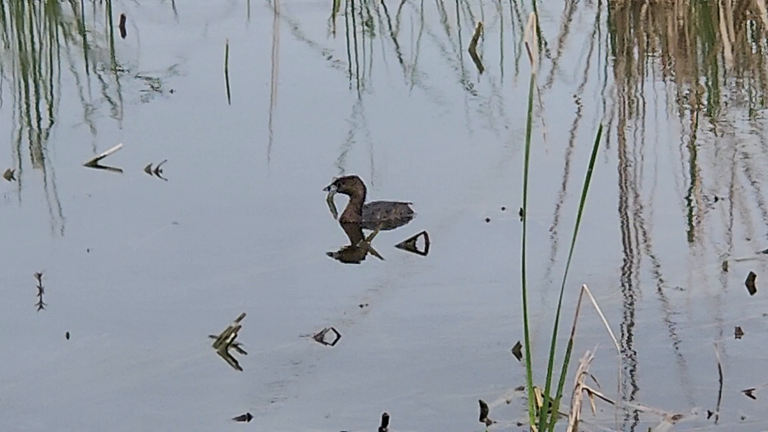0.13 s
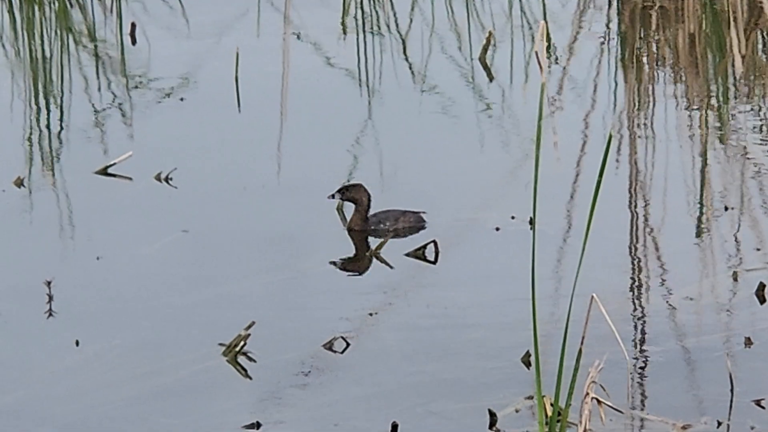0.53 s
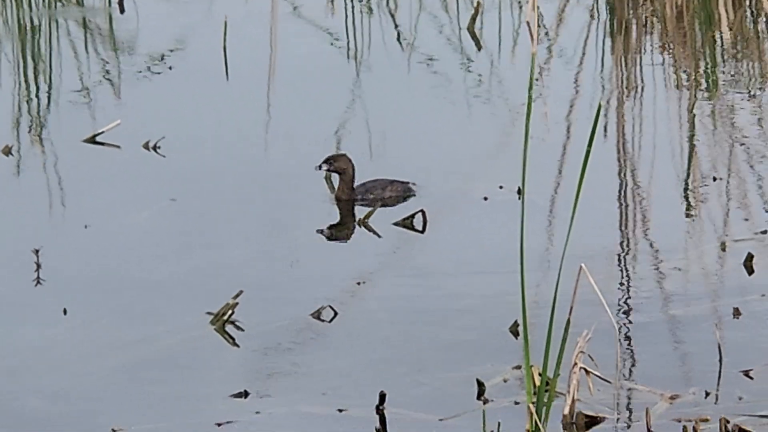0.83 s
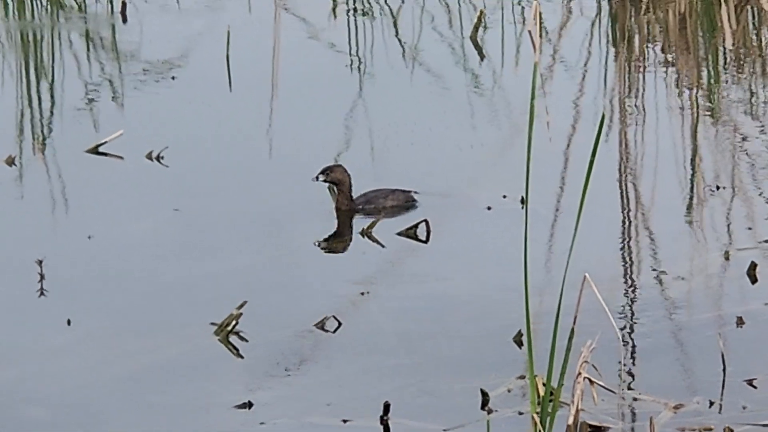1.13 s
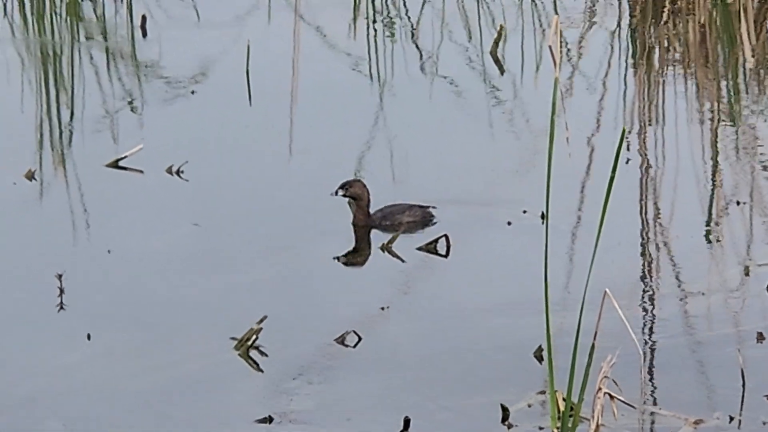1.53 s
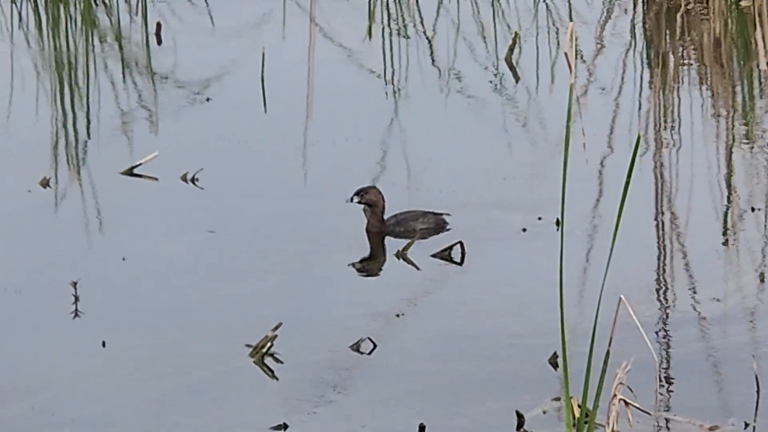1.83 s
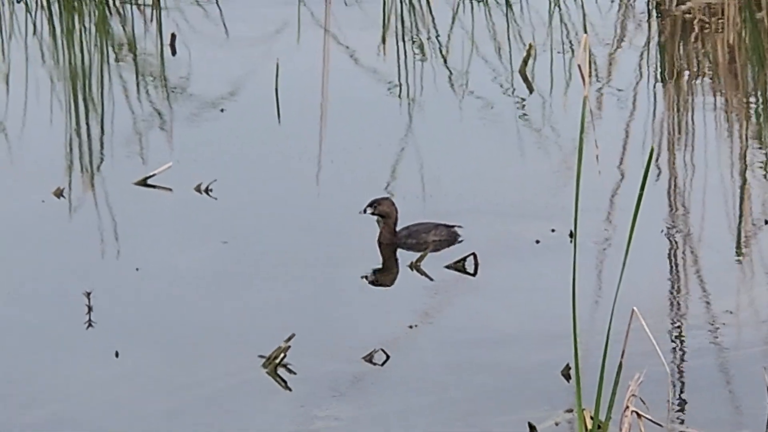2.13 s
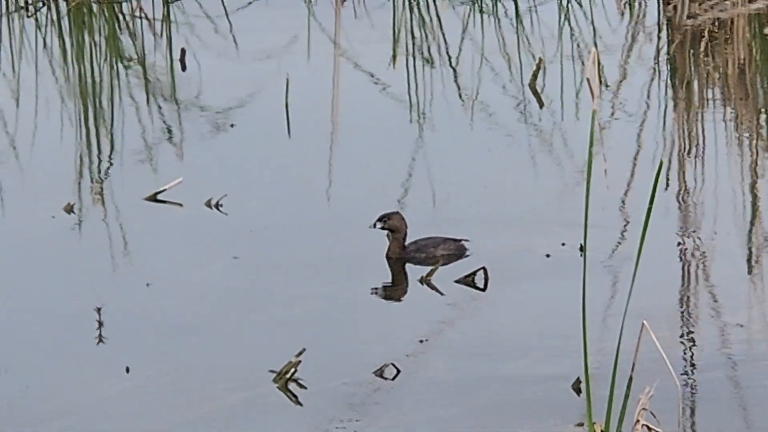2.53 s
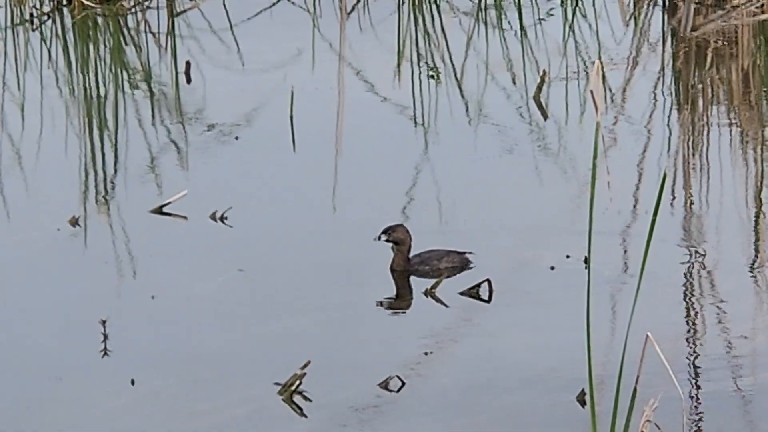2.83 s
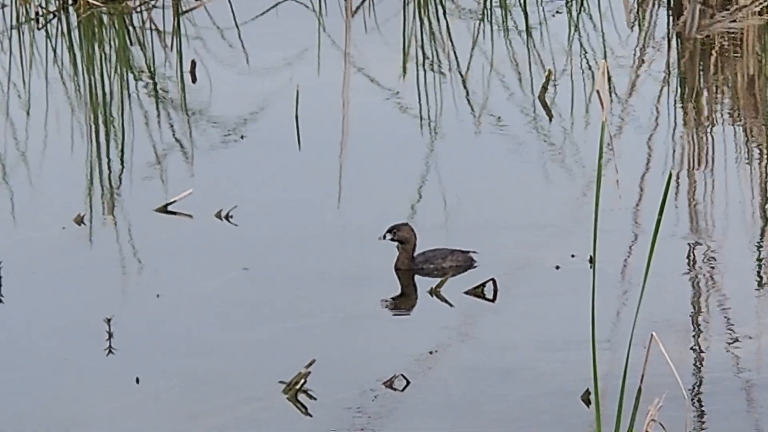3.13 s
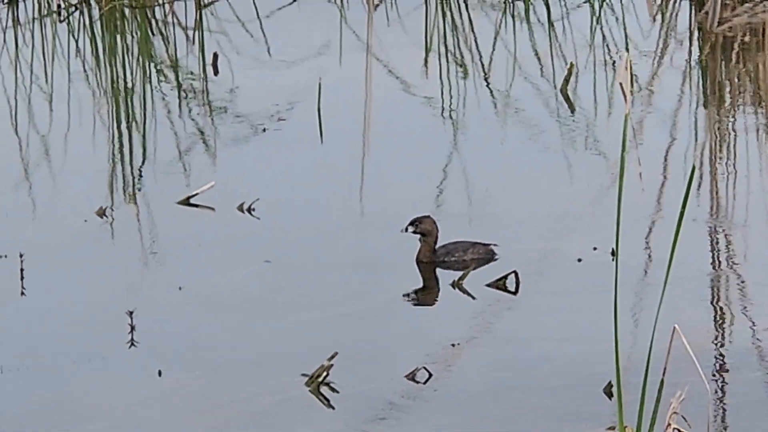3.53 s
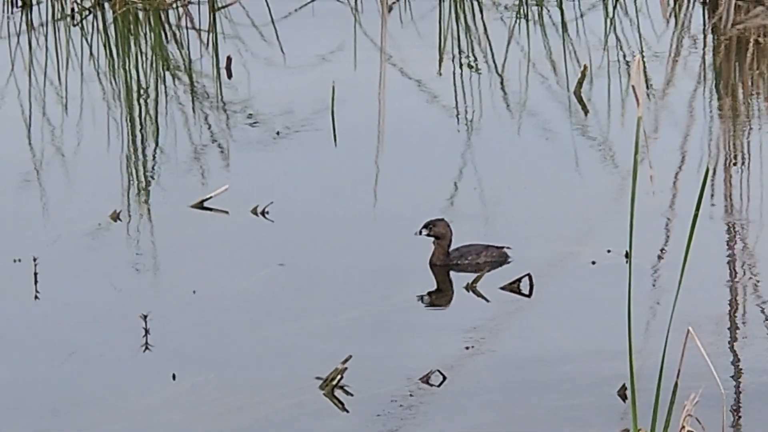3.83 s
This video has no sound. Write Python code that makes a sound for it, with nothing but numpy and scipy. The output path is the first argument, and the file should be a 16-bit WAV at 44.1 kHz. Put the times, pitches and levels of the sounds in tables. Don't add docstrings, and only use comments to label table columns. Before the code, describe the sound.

Wind thuds and low outdoor rumble, with distant bird chirps and one short nasal waterbird call

```python
import sys
import numpy as np
from scipy import signal
from scipy.fft import rfft, irfft
from scipy.io import wavfile
from scipy.ndimage import uniform_filter1d

SR = 44100
rng = np.random.default_rng(int(sys.argv[2]) if len(sys.argv) > 2 else 0)


def volts_from_decibels(level):
    exponent = np.asarray(level, float) / 20
    return 10 ** exponent


def waveform_to_disk(signal):
    frames = np.transpose(np.atleast_2d(signal))
    scaled = np.clip(frames, -1, 1) * 32767
    samples = np.round(scaled).astype(np.int16)
    wavfile.write(sys.argv[1], SR, samples)


N = 176400
PORT_LAG_S = .0001


def rms_one(x):
    return x / np.sqrt(np.mean(x ** 2) + 1e-20)


def in_time(rows):
    s, *columns = np.transpose(rows)
    return [np.interp(np.arange(N) / SR, s, c) for c in columns]


def hump(start, length, edge):
    u = (np.arange(N) / SR - start) / length
    return np.sin(np.pi / 2 * np.clip(np.minimum(u, 1 - u) / edge, 0, 1)) ** 2


def drift(rate):
    r = np.exp(-80 * np.pi * rate / SR)
    chance = rng.standard_normal(N // 40 + 2002)
    slow = signal.lfilter([1], [1, -2 * r, r * r], chance)[2000:]
    return np.interp(np.arange(N) / 40, np.arange(len(slow)), rms_one(slow))


def band(x, lo_hz, hi_hz, order=2):
    return signal.sosfilt(signal.butter(order, [lo_hz, hi_hz], "band", fs=SR, output="sos"), x)


def steady(v, size):
    return v / np.sqrt(uniform_filter1d(v ** 2, size=size) + 1e-9)


def ring(clicks, modes):
    out = 0
    for hz, db, t60 in modes:
        r, w = volts_from_decibels(-60 / (t60 * SR)), 2 * np.pi * hz / SR
        tone = signal.lfilter([0, np.sin(w)], [1, -2 * r * np.cos(w), r * r], clicks + 1e-18)
        out = out + volts_from_decibels(db) * tone
    return out


def place(x, pan_db, lag_s):
    hz = np.arange(N // 2 + 1) * SR / N
    late = irfft(rfft(x) * np.exp(-2j * np.pi * hz * lag_s), N)
    return np.array([late * volts_from_decibels(pan_db / 2), x * volts_from_decibels(-pan_db / 2)])


def coloured(points, alike, pan_db, patchy_db, count=4):
    hz = np.arange(N // 2 + 1) * SR / N + 1e-9
    f, db = np.transpose(points)
    place_in = np.interp(np.log(hz), np.log(f[[0, -1]]), [0, count - 1])
    colour = volts_from_decibels(np.interp(np.log(hz), np.log(f), db)) * (hz > f[0]) * (hz < f[-1])
    white = rfft(rng.standard_normal((3, N))) * colour
    out, together = 0, drift(7.7)
    for k in range(count):
        share = np.sqrt(np.clip(1 - abs(place_in - k), 0, 1))
        shared, *own = irfft(white * share, N)
        both = np.sqrt(alike) * place(shared, 0, PORT_LAG_S) + np.sqrt(1 - alike) * np.array(own)
        out = out + both * volts_from_decibels(patchy_db * (0.12 * together + drift(8.1)))
    return rms_one(out) * volts_from_decibels(np.array([[pan_db / 2], [-pan_db / 2]]))


def lake_air():
    # (time [s], level [dB])
    rumble_levels = [(.76, -60.5), (.9, -45.5), (.99, -60.5), (1.25, -53.5), (1.7, -54), (1.8, -63),
                     (1.92, -47.5), (2.05, -53), (2.2, -62), (2.32, -47.5), (2.43, -57), (2.57, -42),
                     (2.64, -53), (2.94, -48.5), (3.04, -66), (3.3, -60.5)]
    # (pitch [Hz], level [dB per Hz])
    rumble_colour = [(18, -17), (47, -6.5), (65, 4.5), (90, -4.5), (124, -18), (170, -13)]
    hum_colour = [(90, -9.5), (120, -4), (172, -6.5), (204, -3.5), (296, -9.5), (555, -20.5), (750, -14.5),
                  (1250, -28)]
    air_colour = [(1200, -3.5), (1790, 0), (2200, 1.5), (2650, -3), (3100, 3.5), (3620, -8), (4300, -1.5),
                  (5100, -11)]
    hiss_colour = [(5000, -3.5), (6400, -1.7), (7400, -7), (8800, -11.5), (10100, -14.5), (15750, -18.5)]
    # (time [s], length [s], depth [dB])
    mutes = [
        (0.38, 0.27, -37),
        (1.943, 0.25, -25),
        (3.237, 0.48, -21),
        (3.83, 0.2, -38),
    ]
    rumble_db, = in_time(rumble_levels)
    rumble = coloured(rumble_colour, alike=0.98, pan_db=0, patchy_db=7.5, count=2)
    air = volts_from_decibels(rumble_db) * steady(rumble, size=6000)
    air = air + volts_from_decibels(-57.5) * coloured(hum_colour, alike=0.9, pan_db=1.5, patchy_db=3.0)
    air = air + volts_from_decibels(-67.5) * coloured(air_colour, alike=0.28, pan_db=-3.0, patchy_db=1.54)
    air = air + volts_from_decibels(-74) * coloured(hiss_colour, alike=0.24, pan_db=-0.3, patchy_db=-0.9)
    bass = signal.sosfiltfilt(signal.butter(3, 230, fs=SR, output="sos"), air[0])
    mute = volts_from_decibels(sum(db * hump(s, n, 0.021) for s, n, db in mutes))
    return air + np.array([bass * (mute - 1), 0 * bass])


def gusts(rows, top_db):
    level = np.sqrt(sum((volts_from_decibels(db) * hump(s, n, 0.19)) ** 2 for s, n, db in rows)) + 1e-6
    low = steady(band(rng.standard_normal(N), 44.4, 103.8, order=3), size=1800)
    high = steady(band(rng.standard_normal(N), 114.7, 244.4, order=3), size=1150)
    brightness = volts_from_decibels(top_db + 4.57 * drift(41.0)) * (level / volts_from_decibels(-20.5)) ** 0.62
    return level * (low + brightness * high)


def wind():
    # (time [s], length [s], level [dB])
    left_gusts = [(.069, 0.076, -21.5), (.12, 0.052, -19.5), (.16, 0.052, -22), (.2, 0.072, -22),
                  (.27, 0.063, -43.5), (.355, 0.022, -31.5), (.42, 0.032, -39.5), (.65, .05, -46),
                  (.72, 0.024, -44), (3.525, 0.0303, -42.5), (3.7, 0.053, -36.5), (3.74, 0.028, -39),
                  (3.8, 0.053, -57.5)]
    right_gusts = [(.069, 0.058, -40), (.13, 0.058, -29.5), (.21, 0.05, -31), (.25, 0.05, -33.5),
                   (.31, 0.11, -41), (.42, 0.1, -41.5), (.51, .1, -42.5), (1.96, 0.37, -63),
                   (3.3, 0.1, -52.5), (3.4, 0.067, -42.5), (3.48, 0.11, -45), (3.58, 0.17, -42.5),
                   (3.7, 0.043, -26.5), (3.74, 0.05, -40), (3.8, 0.046, -44), (3.91, 0.084, -44)]
    return np.array([gusts(left_gusts, -6.5), gusts(right_gusts, -9.5)])


def knocks(rows, cycles, soft):
    out = np.zeros((2, N))
    for s, db, hz, pan_db in rows:
        click = np.zeros(N)
        click[int(s * SR)] = volts_from_decibels(db)
        tone = ring(click, [(hz, 0, cycles / hz)])
        dull = signal.sosfilt(signal.butter(2, soft * hz, fs=SR, output="sos"), tone)
        out += place(dull, pan_db, 0) * volts_from_decibels(-abs(pan_db) / 2)
    return out


def thuds():
    # (time [s], peak [dB], pitch [Hz], left-right difference [dB])
    port_thuds = [
        (.0915, -9, 264, 26),
        (.145, -26, 240, 12),
        (.19, -9.5, 240, 35),
        (.209, -18.5, 334, 34),
        (3.54, -30, 110, -7),
        (3.712, -25.5, 193, 0.5),
    ]
    return knocks(port_thuds, cycles=5.8, soft=2.17)


def whistles(notes, bend):
    out, wobble = np.zeros(N + SR), np.r_[drift(70), np.zeros(SR)]
    for s, length, first_hz, last_hz, db in notes:
        i, u = int(s * SR), np.linspace(0, 1, int(length * SR))
        w = wobble[i:i + len(u)]
        hz = (first_hz + (last_hz - first_hz) * u ** bend) * (1 + 0.0025 * w)
        loudness = volts_from_decibels(db + 13.5 + 1.9 * w) * np.sin(np.pi * u) ** 0.34
        out[i:i + len(u)] += loudness * np.sin(2 * np.pi * np.cumsum(hz) / SR)
    return out[:N]


def songbirds():
    # (time [s], length [s], first pitch [Hz], last pitch [Hz], level [dB])
    falling_notes = [
        (.215, 0.015, 3860, 3570, -79),
        (.4, 0.043, 3400, 3200, -88),
        (.9, 0.052, 3300, 3120, -85),
        (1.135, 0.035, 3260, 2740, -75.5),
        (1.33, 0.053, 3185, 2660, -73.5),
        (1.535, 0.046, 3190, 2710, -75),
        (1.745, 0.043, 3290, 2720, -73),
        (3.68, 0.034, 3100, 2950, -76.5),
        (3.885, 0.028, 3200, 3000, -81),
    ]
    rising_notes = [
        (.36, 0.046, 3170, 3360, -82),
        (.86, 0.042, 3100, 3380, -77.5),
        (1.71, 0.05, 3420, 3850, -82),
    ]
    straight_notes = [(.16, 0.056, 4070, 3840, -76), (.205, .02, 3060, 3150, -91),
                      (.35, 0.055, 2090, 2070, -83), (.745, 0.023, 3190, 3090, -77),
                      (.9, 0.048, 2064, 2035, -77.5), (2.08, .015, 3720, 3760, -79),
                      (2.16, 0.033, 2170, 2420, -81), (2.29, 0.068, 2950, 2880, -83),
                      (1.59, .03, 2950, 2900, -84), (1.405, 0.022, 2520, 2400, -80.5),
                      (1.43, .05, 3250, 3010, -84), (1.42, 0.045, 2060, 2090, -86),
                      (1.61, .03, 2500, 2400, -84), (2.43, .015, 3750, 3800, -84),
                      (2.44, 0.029, 2200, 2530, -87), (2.512, 0.011, 2920, 2700, -80),
                      (2.875, 0.034, 2020, 2030, -83), (3.045, 0.022, 3370, 3540, -76),
                      (1.4, 0.041, 3190, 3200, -82), (1.67, 0.041, 2036, 1990, -83),
                      (2.225, 0.048, 2550, 3170, -77.5), (2.265, 0.042, 3200, 6500, -83),
                      (2.488, 0.018, 2500, 3360, -71), (2.525, 0.026, 2200, 2120, -77.5),
                      (2.583, 0.013, 2610, 3400, -75), (2.63, 0.013, 2570, 2280, -77),
                      (2.71, 0.02, 2440, 2300, -77), (2.845, 0.025, 2950, 3200, -78),
                      (3.045, 0.024, 2340, 2490, -75), (3.315, 0.032, 2940, 2820, -78),
                      (3.935, .012, 4400, 3350, -77)]
    # (delay [s], level [dB])
    shore_echoes = [
        (.064, -12),
    ]
    far = whistles(falling_notes, bend=4.7) + whistles(rising_notes, bend=0.41)
    far = far + whistles(straight_notes, bend=1.0)
    return far + sum(volts_from_decibels(db) * np.roll(far, int(s * SR)) for s, db in shore_echoes)


def reeds():
    # (time [s], length [s], level [dB])
    rustles = [
        (2.945, .125, -65.5),
        (.6, .1, -77),
    ]
    dull_scuff = (0.276, .035, -69.5)
    grains = rng.standard_normal(N) * volts_from_decibels(1.7 * drift(150))
    tone = band(grains, 1600, 4600) + volts_from_decibels(-3) * band(grains, 4600, 7600)
    tone = tone + volts_from_decibels(-13) * band(grains, 7600, 10500)
    start_s, length_s, scuff_db = dull_scuff
    scuff = rms_one(band(grains, 1800, 2200)) * volts_from_decibels(scuff_db) * hump(start_s, length_s, 0.34)
    return scuff + rms_one(tone) * sum(volts_from_decibels(db) * hump(s, n, 0.2) for s, n, db in rustles)


def waterbird():
    # (time [s], pitch [Hz], level [dB], brightness [dB])
    call = [
        (.612, 490, -50, -30),
        (0.628, 510, -56, -17),
        (0.64, 502, -52, 4.5),
        (0.657, 520, -50.5, 2),
        (0.667, 519, -48.5, -9),
        (0.683, 450, -52, -2),
        (0.699, 390, -59, 8.5),
        (0.734, 363, -59, 7.5),
        (0.749, 380, -67, -8),
    ]
    held_partials = [-17, -2, .4, -5, -19, -.5, .5, -19, -18]
    breaking_partials = [-12, -5, -14, -0.5, -4, -7, -7, -13]
    dropped_partials = [-17, .5, -28, -16, -30, -23, -32, -30, -28, -23]
    held_hz, dropped_hz = 508, 398
    hz, db, bright_db = in_time(call)
    phase = 2 * np.pi * np.cumsum(hz * (1 + 0.0029 * drift(55))) / SR
    high = np.clip((hz - dropped_hz) / (held_hz - dropped_hz), 0, 1)
    partial = []
    for k in range(10):
        partial_db = np.sqrt(k + 1) * drift(46) + bright_db * np.clip((k - 1) / 3, 0, 1)
        partial.append(volts_from_decibels(partial_db) * np.sin((k + 1) * phase))
    held = sum(volts_from_decibels(d) * p for d, p in zip(held_partials, partial))
    breaking = sum(volts_from_decibels(d) * p for d, p in zip(breaking_partials, partial))
    breaking = breaking * (1 + .6 * drift(150))
    dropped = sum(volts_from_decibels(d + 12.5) * p for d, p in zip(dropped_partials, partial))
    falling = np.arange(N) / SR > call[3][0]
    gate = hump(call[0][0], call[-1][0] - call[0][0], 0.04)
    blend = high ** 5.5 * held + falling * 3.3 * high * (1 - high) * breaking
    blend = blend + (1 - high) ** 2 * dropped
    voice = volts_from_decibels(db - 4) * gate * blend
    echo_s = .02
    echo = np.roll(voice, int(echo_s * SR)) + .6 * np.roll(voice, int(1.2 * echo_s * SR))
    return voice + volts_from_decibels(-8) * band(echo, 1300, 3300)


def croak():
    # (time [s], level [dB])
    effort = [
        (2.905, -69),
        (2.93, -66),
        (2.98, -63),
        (3.045, -73),
    ]
    # (pitch [Hz], level [dB], time to die away [s])
    throat = [
        (2400, -8, .015),
        (1750, -26, .008),
    ]
    start_s, pulses_per_s, ragged_s = 2.9095, 117, 2.99
    trail_start_s, trail_s, trail_per_s = 3.03, .34, 700
    s = start_s + np.arange(15) / pulses_per_s
    chance = rng.standard_normal((15, 2))
    s = s + chance[:, 0] * np.where(s > ragged_s, .0025, .0004)
    clicks = np.zeros(N)
    clicks[(s * SR).astype(int)] = volts_from_decibels(2.0 * chance[:, 1])
    db, = in_time(effort)
    trail_db = -80 - 5 * np.clip((np.arange(N) / SR - trail_start_s) / trail_s, 0, 1)
    trail = (rng.random(N) < trail_per_s / SR) * rng.standard_normal(N)
    trail = trail * hump(trail_start_s, trail_s, 0.077)
    pulses = clicks * volts_from_decibels(db + 0.5) + trail * volts_from_decibels(trail_db)
    return ring(band(pulses, 1730, 3200) * 20, throat)


def buzz():
    # (time [s], length [s], level [dB])
    buzzes = [
        (3.05, .12, -75.5),
        (3.215, .12, -76.5),
    ]
    # (pitch [Hz], level [dB], time to die away [s])
    buzz_body = [
        (7240, -14, 0.005),
        (8400, -13, 0.003),
    ]
    clicks = (rng.random(N) < .15) * rng.standard_normal(N)
    throb = .6 + .4 * np.sin(2 * np.pi * 110 * np.arange(N) / SR + 7.2 * drift(35))
    tone = rms_one(ring(clicks * throb, buzz_body)) + 0.51 * rms_one(clicks * throb)
    level = sum(volts_from_decibels(db) * hump(s, n, 0.19) for s, n, db in buzzes)
    return rms_one(band(tone, 6600, 10000)) * level


def plops():
    # (time [s], peak [dB], pitch [Hz], left-right difference [dB])
    water_plops = [
        (3.33, -37, 438, 24),
        (3.655, -36, 378, 36),
        (3.975, -39, 465, 31),
    ]
    return knocks(water_plops, cycles=10.0, soft=7.3)


def scene():
    weather = lake_air() + wind() + thuds()
    birds = place(songbirds(), -5.5, PORT_LAG_S) + place(waterbird(), 1.5, .00005)
    shore = place(reeds() + buzz(), 1.5, .00002) + place(croak(), -3.5, .00005)
    return weather + birds + shore + plops()


def top_cut(x):
    return signal.sosfilt(signal.butter(12, 16700, fs=SR, output="sos"), x)


def record(dry):
    start_s = .0687
    since_start = np.maximum(np.arange(N) / SR - start_s, 0)
    jolt = np.array([[-.06], [-.015]]) * np.exp(-since_start / 0.0062)
    mix = (dry + jolt) * (np.arange(N) >= start_s * SR)
    return top_cut(mix)


dry = scene()
out = record(dry)
waveform_to_disk(out)
```